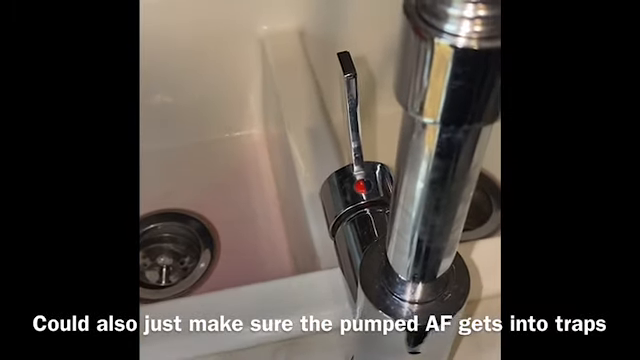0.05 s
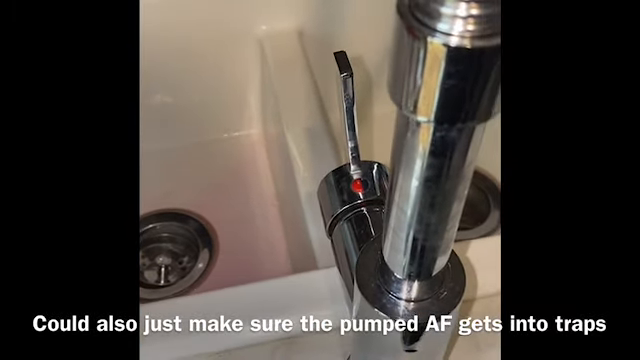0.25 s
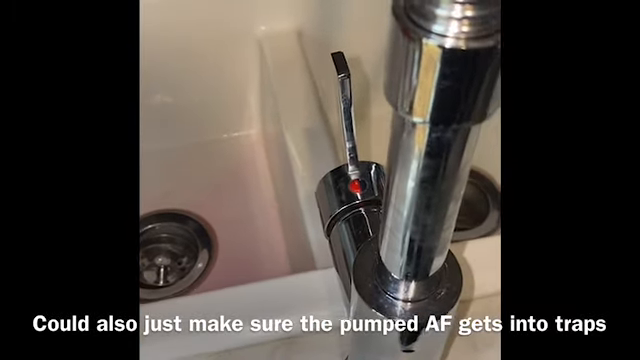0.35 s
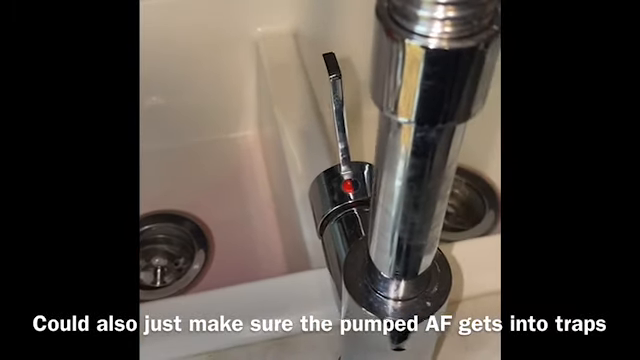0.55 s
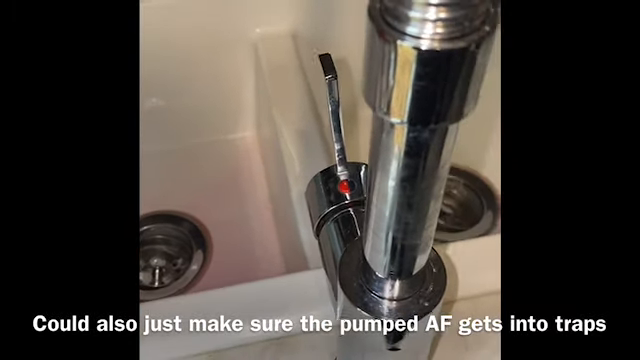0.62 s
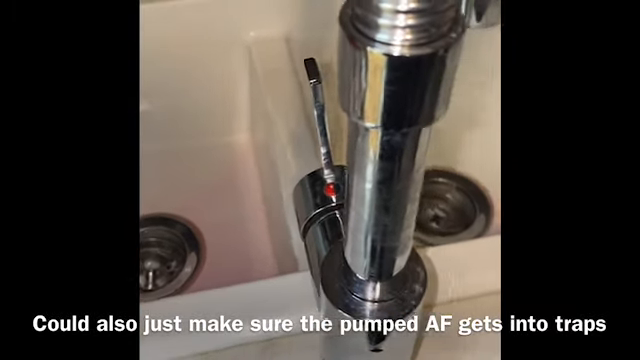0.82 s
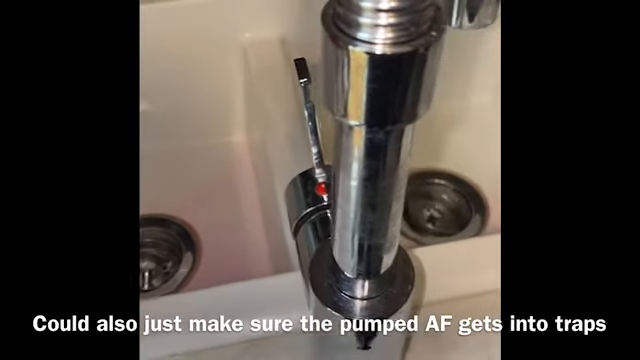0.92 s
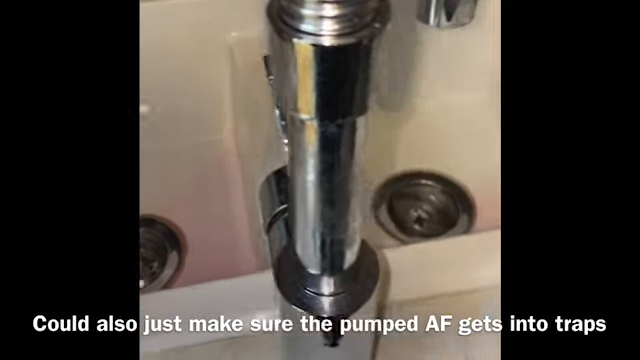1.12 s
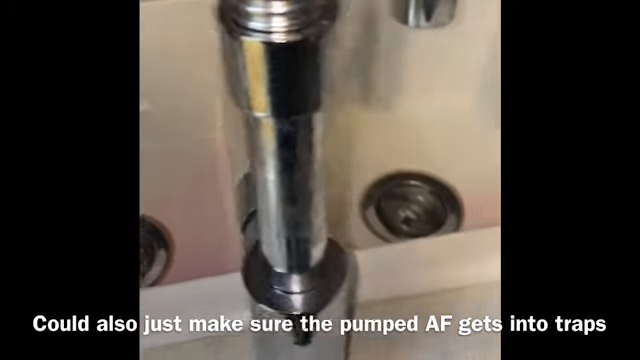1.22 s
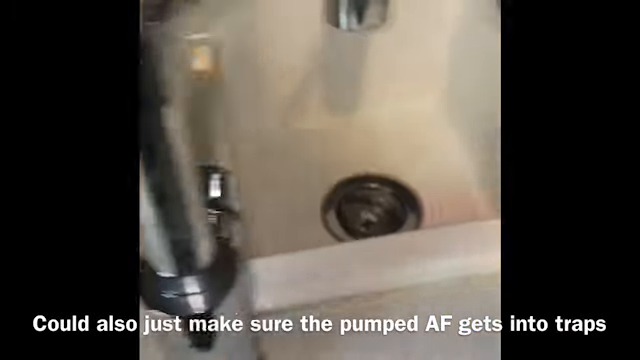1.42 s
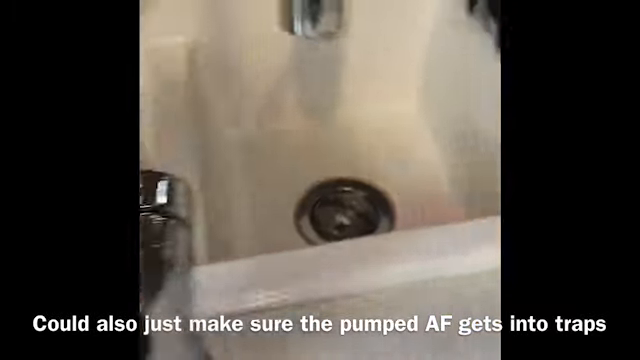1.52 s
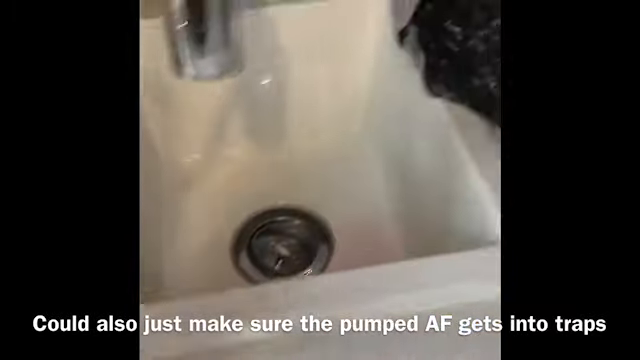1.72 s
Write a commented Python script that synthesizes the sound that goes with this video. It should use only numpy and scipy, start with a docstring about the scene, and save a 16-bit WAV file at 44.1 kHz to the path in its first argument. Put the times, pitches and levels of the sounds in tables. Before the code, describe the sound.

A tap sputters close by, spitting sharp, irregular spurts of air and water into a plastic sink. The pipes thump and bubbles gulp, then the flow settles into a splashing hiss over a faint low rumble.

```python
"""Sharp spurts of spray and low thumps: a camper tap spits trapped air and water into a plastic sink.
Each spurt rings the hollow spout; slugs of water jolt the pipes and make the basin shudder.
Air pockets gulp out as ringing bubbles, and drops drum on the basin and the steel drain.
At last the flow settles into the hiss of jet and splash, over a low rumble heard throughout."""
import sys
import numpy as np
from scipy import signal
from scipy.io import wavfile

SR = 44100
rng = np.random.default_rng(int(sys.argv[2]) if len(sys.argv) > 2 else 0)


def store_pcm(level_fs):
    """Save levels as 16-bit WAV."""
    pcm = np.round(np.clip(level_fs, -1, 1) * 32767).astype(np.int16)
    wavfile.write(sys.argv[1], SR, np.atleast_2d(pcm).T)


N = 77175
T = np.arange(N) / SR
DROPLETS_PER_S, DROPLET_SPREAD_DB = 3500, 8


def from_db(db):
    """Decibels to gain."""
    return 10 ** (np.asarray(db) / 20)


def unit_rms(x):
    """Scale to an rms of 1."""
    return x / np.sqrt(np.mean(x ** 2) + 1e-20)


def level(curve):
    """Gain over time from (s, dB) rows."""
    return from_db(np.interp(T, *np.transpose(curve)))


def at_hz(points, hz):
    """Read a table on a log-frequency axis."""
    freqs, values = np.transpose(points)
    return np.interp(np.log(hz), np.log(freqs), values)


def burst(start_s, rise_s, hold_s, fade_db_per_s):
    """Linear rise, hold, then a steady fall in dB."""
    age = T - start_s
    attack = np.clip(age / max(rise_s, 1e-4), 0, 1)
    return attack * from_db(-fade_db_per_s * np.maximum(age - rise_s - hold_s, 0))


def clicks(per_s):
    """Random droplet impacts of uneven size; rms 1."""
    sizes = from_db(DROPLET_SPREAD_DB * np.minimum(rng.exponential(1, N), 4))
    signs = rng.choice([-1, 1], N)
    return unit_rms(sizes * signs * (rng.random(N) < per_s / SR))


# Stereo width. Each row: frequency in Hz, side minus mid in dB.
WIDTH_DB = [(40, -49), (85, -20.5), (170, -11), (350, -7.5), (700, 5.5), (1500, -1), (3000, 2.84),
            (6000, 0), (7500, 5.5), (9000, 32), (11000, 29), (13000, 10.5), (15000, -6.5)]

def stereo(mid, side, hz):
    """Left and right at constant power; two microphone ports hear the treble in opposite phase."""
    width = from_db(at_hz(WIDTH_DB, hz))
    return (mid + width * side * np.array([[1], [-1]])) / np.sqrt(1 + width ** 2)


def noise_bands(spectrum, click_share):
    """Hiss and droplet clicks in third octaves: centres in Hz, stereo bands whose sum has rms 1."""
    edges = 1000 * 2 ** (np.arange(-17, 14) / 3)
    centres = np.sqrt(edges[1:] * edges[:-1])
    feeds = np.array([np.sqrt(1 - click_share) * rng.standard_normal(N)
                      + np.sqrt(click_share) * clicks(DROPLETS_PER_S) for _ in range(4)])
    run_in = SR // 4  # lets the filters settle
    pairs = np.concatenate([feeds[:, -run_in:], feeds], axis=-1).reshape(2, 2, -1)
    bands = []
    for k, hz in enumerate(centres):
        bandpass = signal.butter(5, edges[k:k + 2], "band", fs=SR, output="sos")
        mid, side = signal.sosfilt(bandpass, pairs[k % 2])[:, run_in:]
        bands.append(from_db(at_hz(spectrum, hz)) * stereo(mid, side, hz))
    bands = np.array(bands)
    return centres, bands / bands.sum(0).std()


def noise(spectrum, click_share):
    """Coloured stereo noise; rms 1."""
    _, bands = noise_bands(spectrum, click_share)
    return bands.sum(0)


def patter(modes, force, drops_per_s):
    """Drops, scaled by the force, ring the damped modes of a body."""
    out = 0
    for hz, db, t60_s in modes:
        radius, angle = from_db(-60 / (t60_s * SR)), 2 * np.pi * hz / SR
        gain = np.sqrt(2 * (1 - radius ** 2)) * np.sin(angle)
        drops = [force * clicks(drops_per_s) + 1e-18 for _ in range(2)]
        mid, side = signal.lfilter([0, gain], [1, -2 * radius * np.cos(angle), radius ** 2], drops)
        out += from_db(db) * stereo(mid, side, hz)
    return out / np.linalg.norm(from_db([db for _, db, _ in modes]))


# Rumble spectrum. Each row: frequency in Hz, relative density in dB.
RUMBLE_SPECTRUM = [(20, -21), (35, -15), (55, -1), (75, -10), (110, -13.5), (200, -30.5), (500, -42),
                   (1500, -52), (15000, -67.5)]

def rumble():
    """Steady low noise, strongest near 55 Hz."""
    return from_db(-57.5) * noise(RUMBLE_SPECTRUM, click_share=0)


# Steel drain. Each row: frequency in Hz, relative level in dB, t60 in seconds.
DRAIN_MODES = [(608, -4, 0.018), (1527, -5.5, 0.024), (1830, -3.5, 0.024), (3237, -3, 0.088),
               (3650, -5, 0.038), (4260, -14.5, 0.039), (4300, -6.5, 0.02), (4990, -11, 0.082)]

def drain():
    """An opening tick and a dying dribble ring the steel strainer."""
    tick = from_db(-59) * burst(0.008, 0, 0, fade_db_per_s=60 / 0.028)
    dribble = from_db(-72.5) * burst(0, 0, hold_s=0.074, fade_db_per_s=103)
    return patter(DRAIN_MODES, tick + dribble, DROPLETS_PER_S)


# Jet loudness. Each row: time in seconds, level in dB.
JET_LEVELS = [(0, -82.5), (.8, -94), (1.1, -79), (1.27, -73.5), (1.33, -66.5), (1.4, -65.5), (1.5, -65.5),
              (1.6, -63), (1.75, -71)]
# Jet spectrum. Each row: frequency in Hz, relative density in dB.
JET_SPECTRUM = [(300, -12), (1000, -5), (2500, -2), (5000, -2), (7000, -1.5), (9300, .5), (12000, -3.5),
                (15500, -4)]

def jet():
    """The unbroken stream hisses, swelling near the end."""
    return level(JET_LEVELS) * noise(JET_SPECTRUM, click_share=0.45)


# Splash loudness. Each row: time in seconds, level in dB.
SPLASH_LEVELS = [(0, -77), (.17, -78.5), (.4, -61.5), (.54, -84), (.62, -89), (.78, -78), (.92, -79.5),
                 (1.05, -74), (1.2, -65.5), (1.29, -74), (1.43, -62), (1.49, -66), (1.64, -59), (1.75, -64)]
# Splash spectrum. Each row: frequency in Hz, relative density in dB.
SPLASH_SPECTRUM = [(300, -4), (700, 2.5), (1700, 0.5), (2500, 1), (3300, -1), (4200, -0.5), (5000, -11.5),
                   (6500, -3.5), (10000, -55), (15500, -38)]

def splash():
    """Water lands in the sink in uneven surges."""
    return level(SPLASH_LEVELS) * noise(SPLASH_SPECTRUM, click_share=0.2)


# Air pockets. Each row: start in seconds, level in dB, pitch in Hz, t60 in seconds.
BUBBLES = [(0.227, -37.5, 253, 0.14), (.684, -55, 309.5, 0.12), (.700, -50, 203, 0.076),
           (.844, -31.5, 491, 0.021), (.846, -46, 678.5, 0.12), (.848, -60.5, 1153, 0.12),
           (.851, -37, 294, 0.11), (1.156, -51.5, 1115, 0.046), (1.386, -58, 479, 0.19),
           (1.389, -56, 792, 0.069), (1.588, -60, 3820, 0.029)]
GULP_RISE_S = 0.0054

def gulps():
    """Air pockets gulp out of the pipe and ring briefly as bubbles."""
    out = 0
    for start, db, hz, t60 in BUBBLES:
        envelope = from_db(db) * burst(start, GULP_RISE_S, 0, 60 / t60)
        out += envelope * np.sin(2 * np.pi * hz * (T - start))
    return out


# Water slugs. Each row: start in seconds, level in dB, starting pitch in Hz, hold in seconds,
# t60 in seconds, relative overtone level in dB, basin shudder in dB.
SLUGS = [(0.215, -31, 93, 0.013, 0.078, -2, -47), (0.261, -36, 67, 0.013, 0.16, -2.5, -48.5),
         (0.328, -42.5, 59, 0.016, .12, -3, -76), (0.406, -39.5, 59.5, 0.038, 0.27, -16.5, -60.5),
         (0.525, -47.5, 58.8, 0.023, 0.079, -13, -60.5), (0.679, -43.5, 70.6, 0.064, 0.22, -25.5, -62.5),
         (0.859, -28, 87.15, 0.013, 0.05, -26, -48.5), (0.888, -36.5, 65.8, 0.023, 0.19, -18, -81),
         (0.96, -41, 64.7, 0.013, 0.061, -18, -56), (1.024, -52.5, 61.7, 0.016, 0.053, -37, -62),
         (1.155, -32.5, 91.1, 0.031, 0.09, -7.5, -49), (1.228, -46.5, 83.6, 0.016, .3, -17, -78.5),
         (1.381, -56, 87.6, 0.0077, 0.092, 2.5, -55.5)]
JOLT_RISE_S = 0.0044

def pipes():
    """Each slug shakes the pipe at a pitch that settles to rest, with one overtone and a weak ring."""
    rest_hz, settle_s, overtone_ratio = 59, 0.25, 2.1
    ring_db, ring_t60_s = -16, 0.63
    out = 0
    for start, db, hz, hold, t60, overtone_db, _ in SLUGS:
        pitch_hz = rest_hz + (hz - rest_hz) * np.exp(-np.maximum(T - start, 0) / settle_s)
        phase = 2 * np.pi * np.cumsum(pitch_hz * (T >= start)) / SR
        tone = np.sin(phase) + from_db(overtone_db) * np.sin(overtone_ratio * phase)
        thump = burst(start, JOLT_RISE_S, hold, 60 / t60)
        ring = from_db(ring_db) * burst(start, JOLT_RISE_S, hold, 60 / ring_t60_s)
        out -= from_db(db) * np.maximum(thump, ring) * tone
    return out


# Plastic basin. Each row: frequency in Hz, relative level in dB, t60 in seconds.
BASIN_MODES = [(129.6, -0.5, 0.047), (189.8, -3.5, 0.35), (226.2, -0.5, .12), (289.8, 3.5, 0.082),
               (334, -4.5, 0.12), (446, 0, 0.043), (528, -0.5, 0.03), (564, -6, 0.1), (676.6, -3.5, 0.063),
               (897, -4.5, 0.029), (1058, -11.5, 0.034), (1175, -6, 0.064)]
# Water drumming on the basin. Each row: time in seconds, level in dB.
DRUMMING_LEVELS = [(0, -68.5), (.09, -86.5), (.17, -72.5), (.3, -55.5), (.4, -63), (.48, -66), (.54, -69.5),
                   (.64, -72.5), (.72, -103.5), (.8, -64.5), (.9, -59), (1.0, -60.5), (1.12, -66.5),
                   (1.22, -61.5), (1.3, -71), (1.43, -56.5), (1.5, -73.5), (1.75, -69)]

def basin():
    """Falling water, pipe jolts and the splutter of the gulps add in power and drive the basin."""
    splutter_db, lowpass_hz = -9, 1840
    jolts = sum(from_db(shudder_db) * burst(start, JOLT_RISE_S, hold / 2, fade_db_per_s=345.5)
                for start, _, _, hold, _, _, shudder_db in SLUGS)
    splutter = sum(from_db(db + splutter_db) * burst(start - GULP_RISE_S, GULP_RISE_S, 0, 60 / t60)
                   for start, db, _, t60 in BUBBLES)
    force = np.sqrt(level(DRUMMING_LEVELS) ** 2 + jolts ** 2 + splutter ** 2)
    ring = patter(BASIN_MODES, force, drops_per_s=1500)
    return signal.sosfilt(signal.butter(2, lowpass_hz, fs=SR, output="sos"), ring)


# Sink wall reflections. Each row: delay in seconds, gain in dB.
WALL_ECHOES = [(.0013, -25.5), (.0029, -20), (.0047, -13.5)]

def sink_walls(water):
    """Close echoes colour the sound of the water."""
    echoes = 0
    for delay, db in WALL_ECHOES:
        delayed = np.array([np.interp(T - delay, T, channel, left=0) for channel in water])
        echoes += from_db(db) * delayed
    return water + echoes


# Spray spectrum. Each row: frequency in Hz, relative density in dB.
SPRAY_SPECTRUM = [(300, 6), (1000, -2), (1800, -0.5), (2700, -3.5), (4200, -8.5), (5600, -3), (7200, -7.5),
                  (9000, -5), (12500, -9), (15500, -10)]
# Hollow spout. Each row: frequency in Hz, relative level in dB, t60 in seconds.
SPOUT_MODES = [(1491, -6, 0.15), (1790, -12, 0.018), (2234, 1, .05), (2543, -2, 0.029), (2730, -3.5, 0.14),
               (3253, -3, 0.09), (3670, 2.5, 0.01), (4094, 0.5, 0.043), (4030, -13, 0.099),
               (4403, -1, 0.019), (4990, 1, 0.035), (5460, -11, 0.047), (5555, 0, 0.011),
               (6500, -17.5, 0.018)]
# Air bursts. Each row: start in seconds, level in dB, rise in seconds, hold in seconds,
# fade in dB per second, tilt in dB per octave, opening spit gain in dB, spout ring in dB.
AIR_BURSTS = [(0.165, -73.5, 0.036, 0.0087, 244, 7, -6, -75),
              (0.205, -55, 0.006, 0.012, 221, 0, -7.5, -63.5),
              (.248, -57, 0.0068, 0.034, 216, -1, 8.5, -66.5),
              (0.362, -58, 0.0006, 0.027, 268, -1.5, 7.5, -60.5),
              (0.493, -71.5, 0.0036, 0.024, 215, -8.5, -11, -69.5),
              (0.634, -64, 0.041, 0.0082, 231.5, 0.9, 5, -73.5),
              (0.836, -66, 0.00096, 0.019, 155, -3.5, -1, -74),
              (0.919, -65, 0.0044, 0.018, 235, 0.5, -10, -78),
              (0.945, -66, 0.0033, 0.022, 287, -0.2, -4, -68), (1.105, -70, 0.016, 0.02, 193, 5.5, 8, -79),
              (1.149, -57.5, 0.0036, 0.0095, 285, 0.5, 8.5, -55.5),
              (1.44, -70, 0.0049, .008, 407, 0, 2, -86), (1.7, -65.5, 0.0038, 0.018, 400, 2.5, 10, -69)]

def spurts():
    """Trapped air drives out bursts of spray that differ in attack and brightness and ring the spout."""
    spit_settle_s, tilt_floor_hz, tilt_pivot_hz = 0.0063, 1000, 4000
    centres_hz, bands = noise_bands(SPRAY_SPECTRUM, click_share=0.57)
    octaves = np.log2(np.maximum(centres_hz, tilt_floor_hz) / tilt_pivot_hz)
    band_gains, spout_force = 0, 0
    for start, db, rise, hold, fade, tilt, spit_db, ring_db in AIR_BURSTS:
        spit = from_db(spit_db * np.exp(-np.maximum(T - start, 0) / spit_settle_s))
        envelope = burst(start, rise, hold, fade) * spit
        band_gains += np.outer(from_db(db + tilt * octaves), envelope)
        spout_force += from_db(ring_db) * envelope
    spray = (bands * band_gains[:, None]).sum(0)
    return spray + patter(SPOUT_MODES, spout_force, DROPLETS_PER_S)


def scene():
    """Jet, splash and spurts between the sink walls, over rumble, pipes, gulps, basin and drain."""
    flow = jet() + splash()
    return rumble() + sink_walls(flow + spurts()) + pipes() + gulps() + basin() + drain()


def record(dry):
    """Steep low-pass at 15.8 kHz."""
    return signal.sosfilt(signal.ellip(10, 0.2, 70, 15800, fs=SR, output="sos"), dry)


dry = scene()
out = record(dry)
store_pcm(out)
```